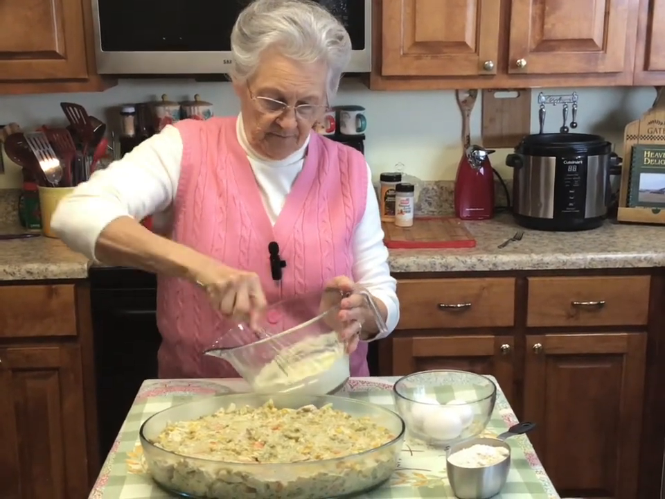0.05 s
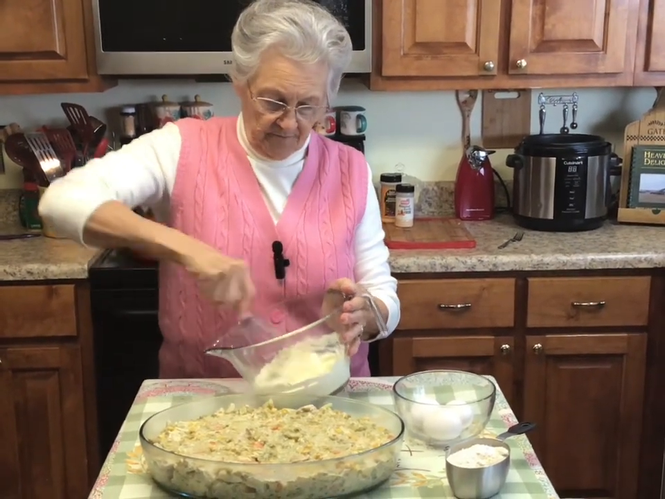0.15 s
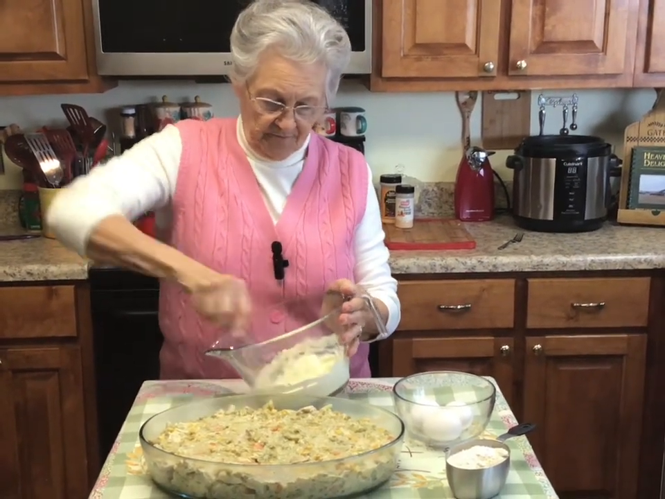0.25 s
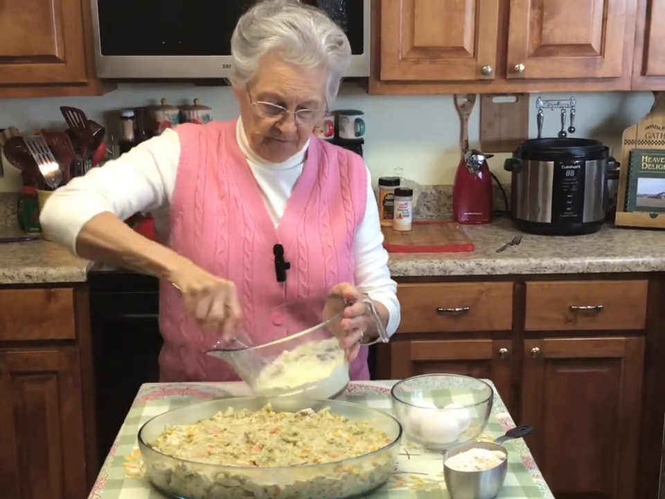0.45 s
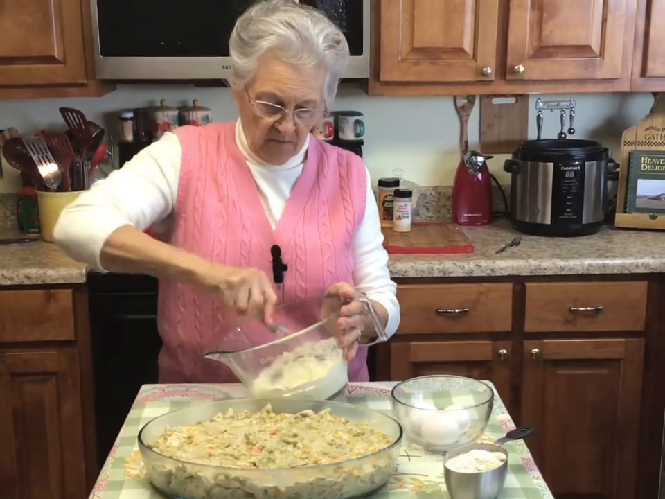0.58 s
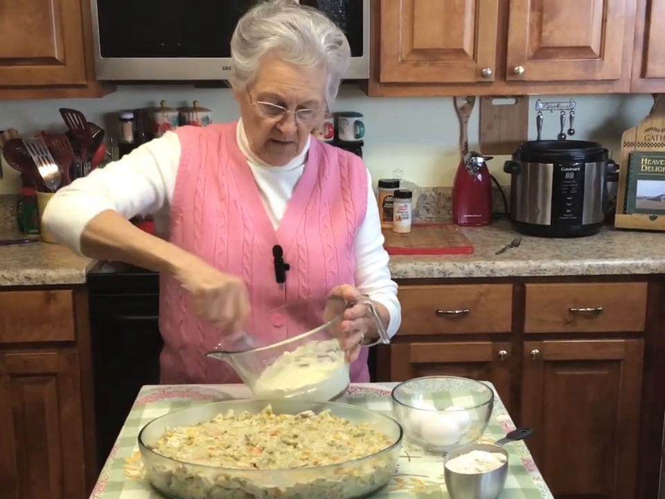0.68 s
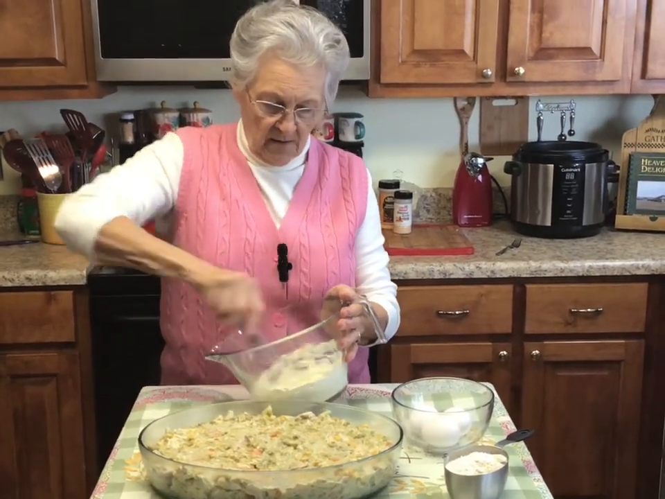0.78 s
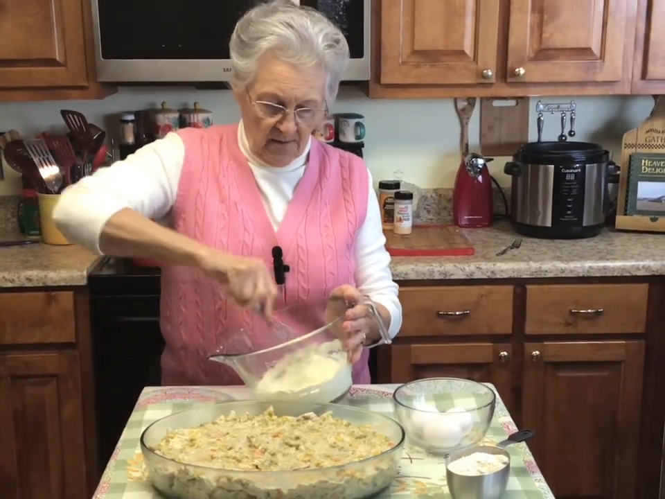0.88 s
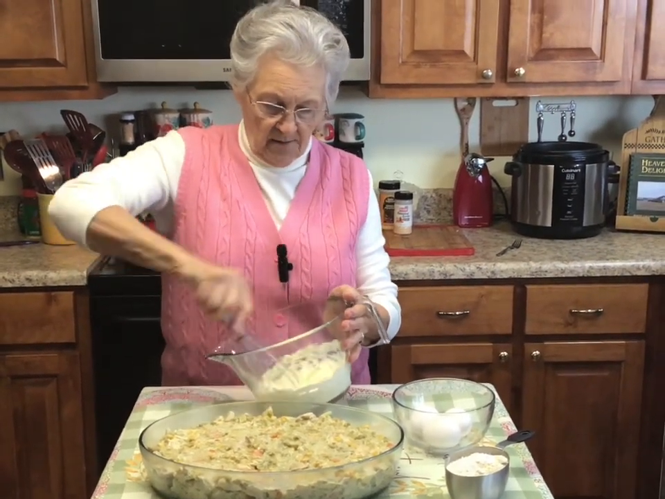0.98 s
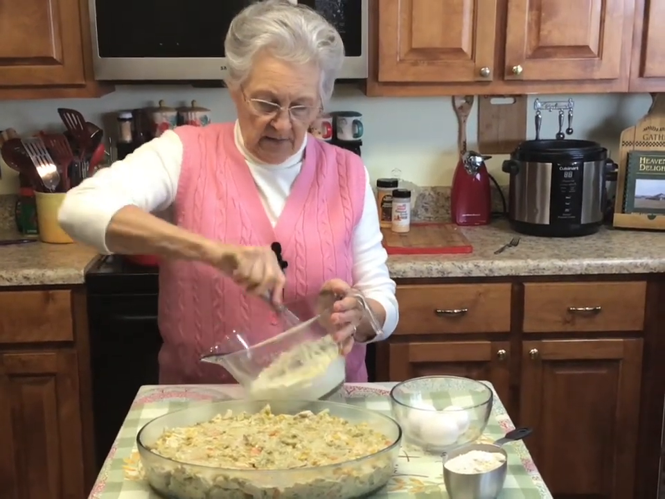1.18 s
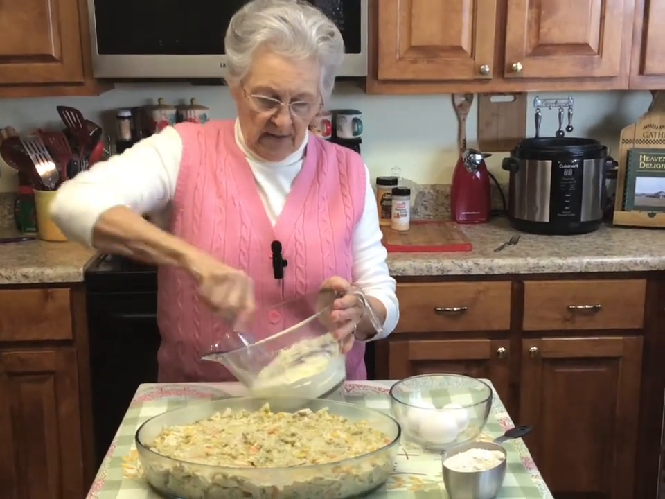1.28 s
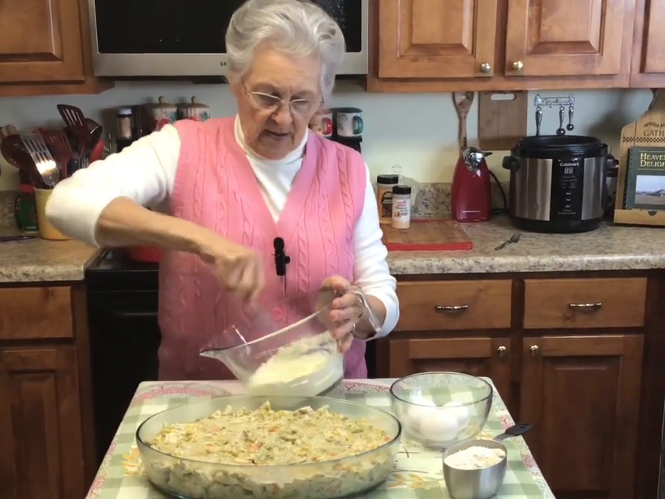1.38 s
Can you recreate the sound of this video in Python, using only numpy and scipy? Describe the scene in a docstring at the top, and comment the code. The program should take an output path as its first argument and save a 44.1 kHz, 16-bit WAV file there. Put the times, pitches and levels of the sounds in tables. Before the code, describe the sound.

Quick uneven whisk strokes tick against glass, lightly ringing the bowl, with dull wet slaps from the thick mix between them. The loudest clank comes late, then lighter clicks follow; faint room hush, short kitchen echo, close mono microphone.

```python
"""In a small kitchen, a wire whisk beats soft cheese in a hand-held glass bowl, heard by a lapel microphone.
Each stroke is a short rattle of wire ticks: bursts of noise that also set off many brief high glass tones.
Stronger blows ring the bowl in three low tones, the mix slaps wetly as puffs of noise, and small air
pockets pop as short blips. The bowl now and then bumps the table with a low push. Echoes and room air
are shaped noise."""
import sys
import numpy as np
from scipy import signal
from scipy.fft import rfft, irfft
from scipy.io import wavfile
from scipy.ndimage import uniform_filter1d

SR = 44100
rng = np.random.default_rng(int(sys.argv[2]) if len(sys.argv) > 2 else 0)


def digitize_waveform(pressure):
    """Quantize a signal to 16-bit integers and store it at the path in sys.argv[1].

    Rows of a 2-D input are taken as channels; values are limited to [-1, 1].
    """
    field = np.atleast_2d(pressure).T
    bounded = np.clip(field, -1, 1)
    quanta = np.round(bounded * 32767).astype(np.int16)
    wavfile.write(sys.argv[1], SR, quanta)


def field_ratio(decibels):
    """Amplitude ratio for a level in dB (20 dB per decade); scalars and array-likes work."""
    return 10 ** (np.asarray(decibels, dtype=float) / 20)


N = 63945  # length of the scene in samples

# Colour of the room air: pitch_hz, relative level_db (per Hz)
AIR_COLOUR = [(20, 9), (60, -4.5), (150, -2.5), (380, -2.5), (520, -7), (800, -17), (4000, -6.5),
              (16000, -22)]
# Wires landing on the glass: peak_s, level_db (12 dB is taken off later), rattle_s (time constant), treble_db
CONTACTS = [(.001, -38.5, 0.0042, -5), (.030, -40, 0.0031, 3.5), (0.046, -47.5, 0.0087, 1.5),
            (.080, -49, 0.0033, 5.5), (0.096, -65, 0.00083, -38), (0.118, -48, 0.0031, -2),
            (0.139, -42.5, 0.00033, 0), (0.145, -39.5, 0.0016, -5), (0.155, -37, 0.0075, 3.5),
            (.221, -19, .0034, 1.5), (0.3154, -30, 0.0076, 4), (.349, -41.5, 0.0044, 1.5),
            (0.382, -45, 0.0033, 0), (0.434, -25, 0.0045, 3), (.443, -22, 0.0046, 5),
            (.467, -42.5, 0.0031, 14.5), (0.53, -46.5, 0.0026, 2), (0.536, -42, 0.0067, -2),
            (0.566, -24, 0.0051, 4), (0.625, -47, 0.0027, -14), (.642, -39.5, .003, -7),
            (0.686, -23.5, 0.0025, 2.5), (0.716, -32, 0.008, -5), (0.718, -58, 0.0033, 4),
            (0.73, -34, 0.0034, 1.5), (0.781, -44.5, 0.0014, 2), (0.786, -45.5, 0.0086, 3.5),
            (0.803, -48.5, 0.0033, 2), (0.824, -26.5, 0.0067, -7.5), (0.826, -23, 0.0068, -6.5),
            (0.8902, -40, 0.0027, 0.5), (0.91, -52.5, 0.0028, 7), (0.933, -44.5, 0.0041, -12),
            (.978, -42, 0.0026, 0), (.986, -24.5, 0.0039, 8.5), (1.095, -8, 0.0039, -1.5),
            (1.1683, -27.5, 0.0036, 0.5), (1.212, -27, 0.0037, 1.5), (1.224, -32, 0.0074, 6),
            (1.293, -37.5, 0.0048, 2), (1.3, -38.5, 0.0044, 2), (1.312, -42, 0.0023, 3),
            (1.318, -35.5, 0.0047, -6), (1.328, -25, 0.0025, -3), (1.335, -33.5, 0.0021, 9),
            (1.341, -26.5, 0.0024, -12), (1.351, -26, 0.00354, -5), (1.391, -58, 0.0049, -18),
            (1.395, -27.5, 0.0023, -18), (1.404, -56, 0.0016, -16), (1.411, -24.5, .002, -6.5),
            (1.445, -30.5, .001, -13)]
# Colour of one wire tick on glass: pitch_hz, relative level_db (per Hz)
TICK_COLOUR = [(500, -17), (1200, -3.5), (2200, -7.5), (3700, 2.5), (6500, -1), (8000, -14.5), (9500, -5.5),
               (14500, -2.5), (16000, -17), (16800, -60)]
# High tones of bowl and wires: pitch_hz, relative level_db, t60_s (time to fall by 60 dB)
HIGH_TONES = [(2290, -12, .05), (2476, -12, .06), (3300, -13, .035), (3620, -11, .04), (3790, -8, .045),
              (4420, -7, .045), (5080, -5, .045), (5295, -10, .04), (5515, -9, .04), (5840, -8, .05),
              (7000, -9, .03), (9400, -10, .022), (11300, -13, .02), (13650, -11, .02), (14500, -11, .02)]
# Blows that set the whole bowl ringing: start_s, low_tone_db, middle_tone_db, upper_tone_db
RINGS = [(0., -67.5, -65, -47), (.029, -73, -69, -44.5), (.153, -57, -79, -63), (.221, -29.5, -48, -40),
         (.315, -36.5, -49, -47), (.443, -49, -44, -46), (.566, -35.5, -48, -38.5), (.827, -43, -49, -40.5),
         (.985, -46, -55, -49), (1.094, -30, -23, -18), (1.213, -37.5, -41.5, -25), (1.227, -37, -63, -58),
         (1.293, -41.5, -65, -44.5), (1.350, -45.5, -48, -48)]
# Pitches of the bowl's low tones: tone_hz, twin_hz
LOW_PITCHES = [(619, 648), (1012, 970), (1411, 1528)]
# How each low tone grows and dies: t60_s, swell_s (time constant), twin_db (against the tone), twin_t60_s
LOW_SHAPES = [(0.13, 0.0076, -17.5, 0.14), (0.16, 0.012, -28, 0.3), (0.14, 0.0057, -9.5, 0.11)]
# How long the kitchen's echoes last: pitch_hz, t60_s
KITCHEN_DECAY = [(300, 0.67), (800, .22), (2000, .18), (5500, 0.16), (14000, 0.18)]
# Wet slaps of the mix: start_s, level_db, centre_hz, t60_s
SLAPS = [(.118, -65, 1540, 0.034), (.153, -55, 600, 0.041), (.433, -34.5, 555, 0.048),
         (.443, -41, 1010, 0.11), (.467, -51.5, 940, 0.065), (.535, -55.5, 830, 0.18),
         (.564, -36.5, 735, 0.021), (.628, -49.5, 1450, 0.028), (.686, -30.5, 855, 0.025),
         (.698, -38, 857, 0.065), (.720, -35, 1546, 0.048), (.731, -40, 1270, 0.021),
         (.827, -45, 754, 0.045), (.890, -50, 570, 0.069), (.985, -41, 1585, 0.049),
         (1.094, -39.5, 880, 0.034), (1.169, -39, 600, 0.085), (1.181, -46, 594, 0.15),
         (1.213, -38.5, 805, 0.028), (1.298, -44.5, 1550, 0.036), (1.333, -45, 1530, 0.091),
         (1.350, -37.5, 648, 0.024), (1.394, -58.5, 715, 0.055), (1.401, -39.5, 1340, 0.018),
         (1.411, -43.5, 940, 0.014)]
# Colour of a slap: pitch (share of its centre), relative level_db (per Hz)
SLAP_COLOUR = [(.3, -24.5), (.6, -14.5), (.88, -4), (1., 1.5), (1.14, -15.5), (1.8, -13), (4., -27.5)]
# Soft bumps through the table and clothing: start_s, level_db, pitch_hz, length_s
BUMPS = [(0.334, -65, 41.5, 0.074), (0.425, -57, 101, 0.065), (0.686, -68.5, 107.5, 0.026),
         (1.156, -53, 133.3, 0.053), (1.202, -64.5, 140.4, 0.053), (1.186, -53, 27.8, 0.11),
         (1.327, -74, 200, 0.014), (1.415, -64, 75, 0.024)]
# Small air pockets popping in the mix: start_s, level_db, pitch_hz, length_s
POPS = [(0.61, -44, 1434, .006), (.950, -46, 1440, 0.0065), (0.963, -57, 1440, 0.0045),
        (0.97, -49, 1460, 0.0095)]


def evened(x):
    """Scales a sound to an rms (average strength) of 1."""
    return x / np.sqrt(np.mean(x ** 2) + 1e-20)


def read(points, hz):
    """Reads a table at any pitch, with pitch on a log scale."""
    f, value = np.transpose(points)
    return np.interp(np.log(hz + 1), np.log(f + 1), value)


def add(mix, s, sound):
    """Mixes a sound in at time s."""
    part = mix[max(round(s * SR), 0):][:len(sound)]
    part += sound[:len(part)]


def coloured(points, size):
    """Noise of rms 1 with the given spectrum."""
    spectrum = rfft(rng.standard_normal(size))
    hz = np.fft.rfftfreq(size, 1 / SR)
    return evened(irfft(spectrum * field_ratio(read(points, hz)), size))


def room_air():
    """The steady hush of the room: noise with a fixed colour."""
    air_db = -70
    return field_ratio(air_db) * coloured(AIR_COLOUR, N + N % 2)[:N]


def wire_ticks(t, lead_s, rise_s, rattle_s):
    """Wires land at random moments, strongest around the peak, with one tick always at the peak."""
    ticks_per_s, tick_spread_db, peak_tick = 2500, 5, 2
    before, after = np.minimum(t - lead_s, 0), np.maximum(t - lead_s, 0)
    shape = np.exp(before / rise_s - after / rattle_s)
    size = field_ratio(tick_spread_db * np.minimum(rng.exponential(1, len(t)), 4))
    size = size * rng.choice([-1., 1.], len(t))
    lands = rng.random(len(t)) < ticks_per_s / SR
    ticks = size * lands * shape
    ticks[round(lead_s * SR)] = peak_tick
    # the same total energy however the ticks happen to fall
    return ticks / (np.linalg.norm(ticks) / np.linalg.norm(shape) * np.sqrt(SR / ticks_per_s))


def glass_ring(t):
    """The high glass tones of a rattle, a little different in strength and pitch each time."""
    spot_db = 3  # spread of tone strength with the spot struck
    detune = .002  # spread of pitch, as a share
    hz, db, t60 = np.transpose(HIGH_TONES)[:, :, None]
    spot, tune = rng.standard_normal((2, len(hz), 1))
    strength = field_ratio(db + spot_db * spot - 60 * t / t60)
    return (strength * np.sin(2 * np.pi * hz * (1 + detune * tune) * t)).sum(0)


def contact(peak_s, level_db, rattle_s, treble_db):
    """The wires land one after another; every tick cracks and rings the glass."""
    tick_t60, high_db = 0.0089, -13  # high_db: factor on the glass tones
    shimmer_db, shimmer_t60 = -19.5, .12  # the wires' dense after-rattle
    t = np.arange(8000) / SR
    rattle_s = max(rattle_s, .0005)
    rise_s = min(.0018, rattle_s / 2)
    lead_s = 4 * rise_s
    ticks = wire_ticks(t, lead_s, rise_s, rattle_s)
    fading = field_ratio(-60 * t / tick_t60) + field_ratio(shimmer_db - 60 * t / shimmer_t60)
    crack = coloured(TICK_COLOUR, len(t)) * fading
    one_tick = crack + field_ratio(high_db) * glass_ring(t)
    rattle = signal.fftconvolve(ticks, one_tick)[:len(t)] * field_ratio(level_db - 12)
    # flat up to 3 kHz, then sloping to treble_db at 12 kHz and above
    tilt = field_ratio(read([(3000, 0), (12000, treble_db)], np.fft.rfftfreq(len(t), 1 / SR)))
    return peak_s - lead_s, irfft(rfft(rattle) * tilt, len(t))


def ring(start_s, *tones_db):
    """The bowl's three low tones swell and die, each beating with a weaker twin close in pitch."""
    waver_db, waver_s = 1.5, .012  # the moving mix damps the low tones unevenly
    t, out = np.arange(12000) / SR, 0
    span = round(waver_s * SR)
    for (hz, twin_hz), (t60, swell_s, twin_db, twin_t60), db in zip(LOW_PITCHES, LOW_SHAPES, tones_db):
        drift = uniform_filter1d(rng.standard_normal(len(t)), span)
        waver = evened(uniform_filter1d(drift, span))
        swell = 1 - np.exp(-t / swell_s)
        tone = field_ratio(waver_db * waver - 60 * t / t60) * swell * np.sin(2 * np.pi * hz * t)
        twin = field_ratio(twin_db - 60 * t / twin_t60) * np.sin(2 * np.pi * (twin_hz * t + rng.random()))
        out = out + field_ratio(db) * (tone + twin)
    return start_s, out


def kitchen(x):
    """Sparse echoes of random sign, each band dying at its own speed.

    Three random echo patterns blend in turn, so no single one colours the whole tail."""
    turn_hz = 1.475  # how fast the three echo patterns trade places
    kitchen_db = -10
    out, turn = np.zeros(N), 2 * np.pi * turn_hz * np.arange(N) / SR
    for k in range(3):
        taps = np.zeros(SR // 2)
        slots = np.arange(200, SR // 2 - 6, 6)
        at = slots + rng.integers(0, 6, len(slots))  # one echo at a random place in each slot
        taps[at] = rng.choice([-1., 1.], len(at))
        hz, t, z = signal.stft(taps, SR, nperseg=256)
        fading = field_ratio(-60 * t / read(KITCHEN_DECAY, hz)[:, None])
        tail = signal.istft(z * fading, SR, nperseg=256)[1]
        # the squares of the three shares always add up to 1
        share = np.sqrt(2 / 3) * np.cos(turn + k * np.pi / 3)
        out += signal.fftconvolve(x * share, tail / np.linalg.norm(tail))[:N]
    return field_ratio(kitchen_db) * out


def slap(start_s, level_db, centre_hz, t60):
    """A short puff of noise around the hollow note of the mix."""
    attack_s = 0.0012
    t = np.arange(6000) / SR
    puff = coloured([(share * centre_hz, db) for share, db in SLAP_COLOUR], len(t))
    return start_s, field_ratio(level_db - 60 * t / t60) * np.minimum(t / attack_s, 1) * puff


def bump(start_s, level_db, hz, length_s):
    """A soft low push with a rumbling edge."""
    roughness = 0.48  # rumble strength against the tone
    t = np.arange(0, length_s, 1 / SR)
    colour = [(hz / 4, -20), (hz / 2, -3), (hz * 2, -3), (hz * 5, -18), (hz * 20, -70)]
    rumble = coloured(colour, 8192)[:len(t)]
    shape = np.sin(np.pi * (t / length_s) ** 0.89) ** 2
    return start_s, field_ratio(level_db) * shape * (np.sin(2 * np.pi * hz * t) + roughness * rumble)


def pop(start_s, level_db, hz, length_s):
    """An air pocket pops as a soft blip of several cycles."""
    t = np.arange(0, length_s, 1 / SR)
    return start_s, field_ratio(level_db) * np.sin(np.pi * t / length_s) * np.sin(2 * np.pi * hz * t)


def scene():
    """Whisk, bowl and mix with the kitchen's tail, bumps and room air."""
    bowl, body = np.zeros(N), np.zeros(N)
    for source, rows in ((contact, CONTACTS), (ring, RINGS), (slap, SLAPS), (pop, POPS)):
        for row in rows:
            add(bowl, *source(*row))
    for row in BUMPS:
        add(body, *bump(*row))
    low_cut = signal.butter(4, 425, "high", fs=SR, output="sos")  # a small bowl radiates no bass
    bowl = signal.sosfilt(low_cut, bowl)
    return (bowl + kitchen(bowl) + body + room_air())[None]


def low_pass(x):
    """Removes everything above the highest recorded frequency."""
    return signal.sosfilt(signal.butter(12, 16810, fs=SR, output="sos"), x)


def record(dry):
    """A soft gate lowers quiet moments above the bass."""
    gate_db, gate_slope, gate_s = -49, 0.4, 0.024  # slope: dB of cut for each dB below the gate
    bass = signal.sosfiltfilt(signal.butter(2, 300, fs=SR, output="sos"), dry)
    rest = dry - bass
    power = abs(uniform_filter1d(rest ** 2, round(gate_s * SR)))
    power_db = 10 * np.log10(power + 1e-12)
    gain = field_ratio(gate_slope * np.minimum(power_db - gate_db, 0))
    return low_pass(bass + rest * gain)


dry = scene()
out = record(dry)
digitize_waveform(out)
```